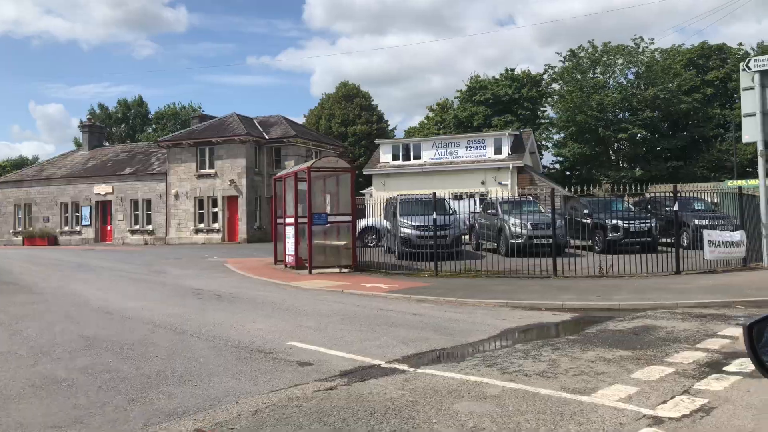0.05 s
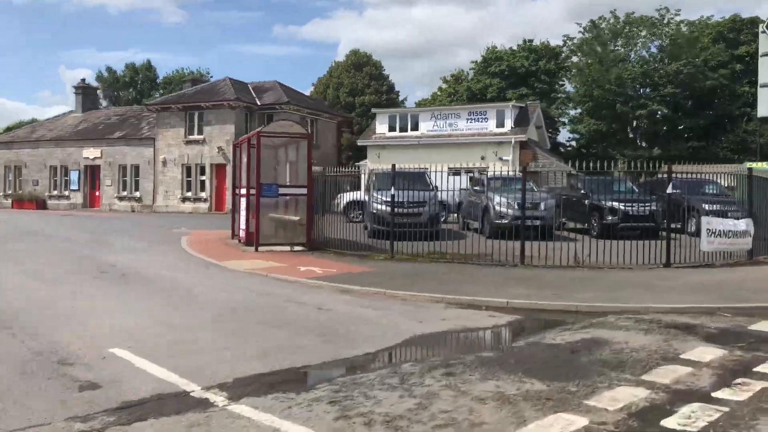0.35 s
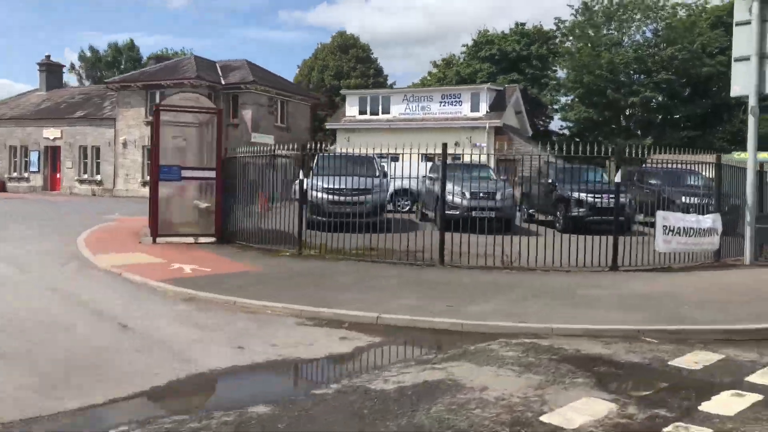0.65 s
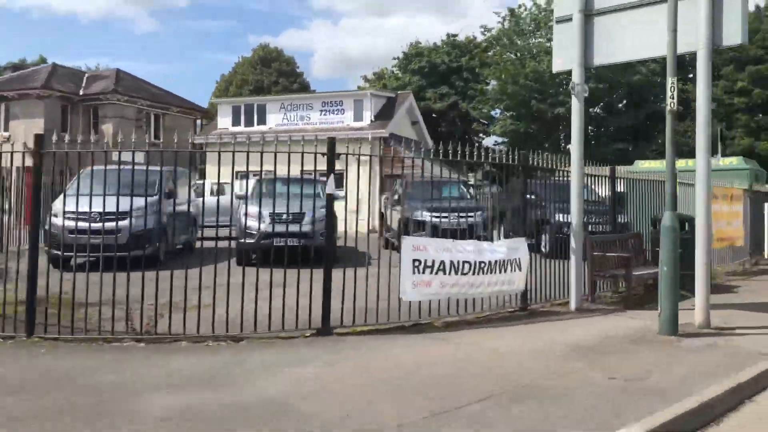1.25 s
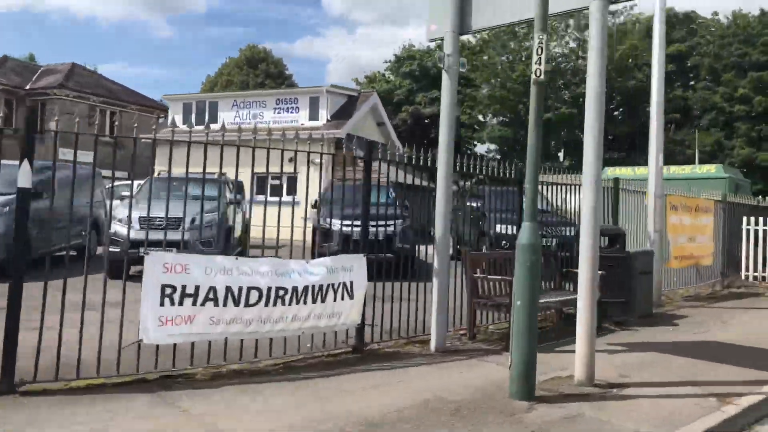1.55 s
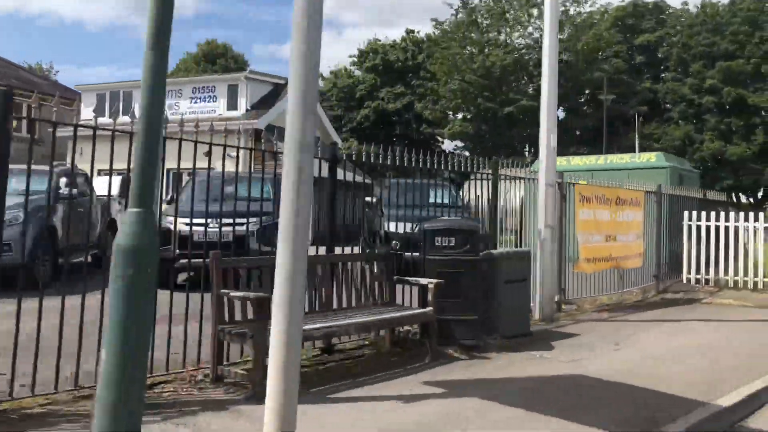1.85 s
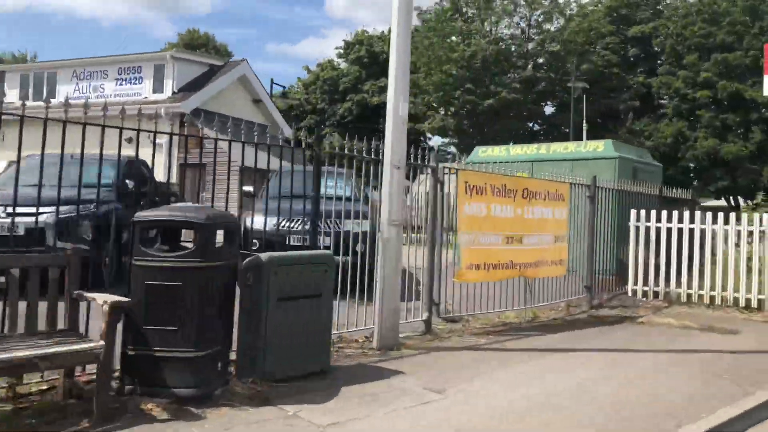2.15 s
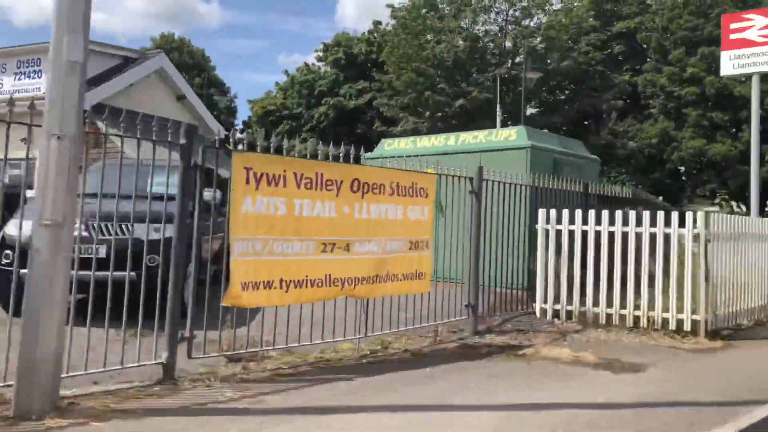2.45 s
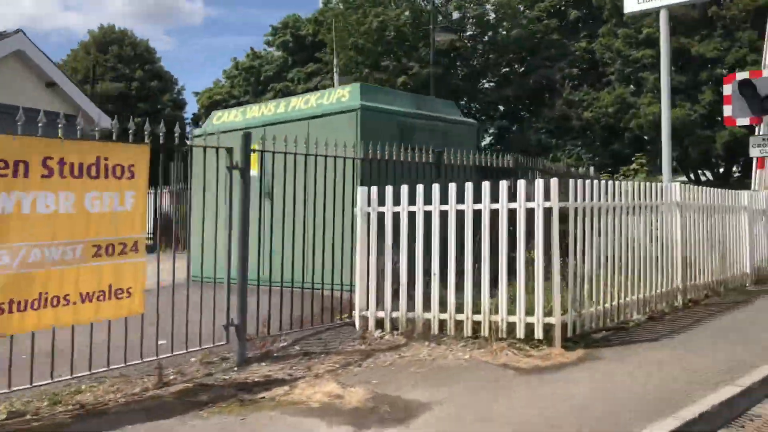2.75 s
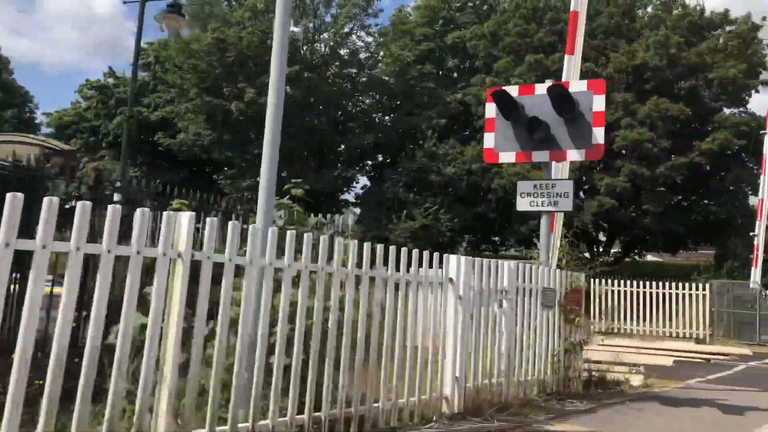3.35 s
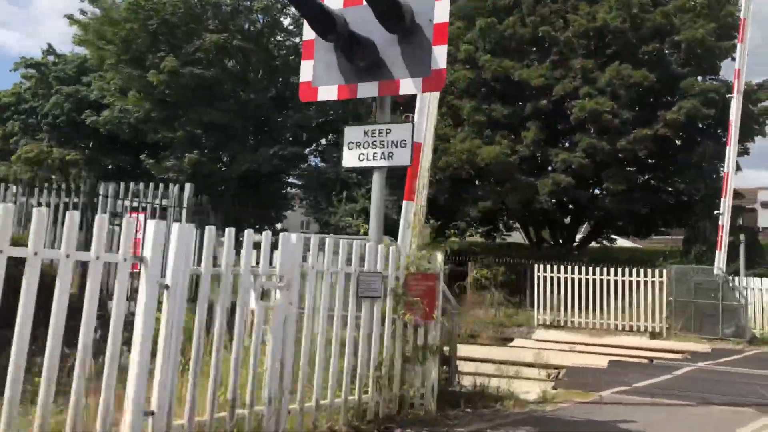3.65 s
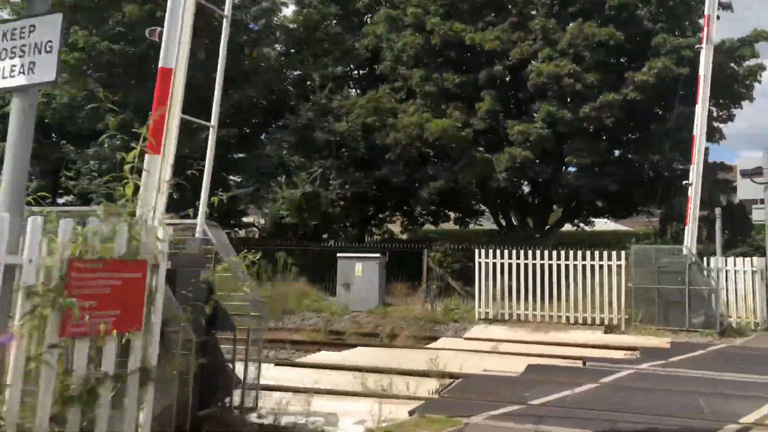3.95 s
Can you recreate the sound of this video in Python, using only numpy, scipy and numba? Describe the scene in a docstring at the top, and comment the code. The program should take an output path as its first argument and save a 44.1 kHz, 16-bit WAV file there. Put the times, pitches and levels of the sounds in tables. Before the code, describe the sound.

Gusts of wind rumble, pop and crack on the microphone at a moving car's open window. Softer tyre hiss from the street fades as the car slows, with faint ticks and distant chirps near the end.

```python
"""Wind buffets a microphone at the open window of a car rolling through a town.
From the start the airflow rumbles, with tyre hiss behind it. Gusts shed smaller eddies, so the
rumble flares into short rasps and pops; some gusts crack. After 2.5 s the hiss fades as the
car slows. Near 2.9 s come the first of four faint knocks and a high squeak, near 3.8 s three far
chirps. A limiter holds the peaks throughout."""
import sys
import numpy as np
from scipy import signal
from scipy.fft import rfft, irfft
from scipy.io import wavfile
from scipy.ndimage import uniform_filter1d, minimum_filter1d
from numba import njit

SR = 44100
rng = np.random.default_rng(int(sys.argv[2]) if len(sys.argv) > 2 else 0)


def materialize(psi):
    """Save the field psi as 16-bit PCM at rate SR to the path in sys.argv[1].

    A 1-D psi becomes a single channel; in a 2-D psi each row is a channel.
    """
    bounded = np.clip(np.atleast_2d(psi).T, -1, 1)
    quanta = np.round(bounded * 32767).astype(np.int16)
    wavfile.write(sys.argv[1], SR, quanta)


N = 176400


def undb(db):
    """Decibels to gain."""
    return 10 ** (np.asarray(db) / 20)


def curve(table):
    """Straight lines through (t/s, value) rows."""
    return np.interp(np.arange(N) / SR, *np.array(table).T)


def bell(t, at_s, length_s):
    """Flat-topped hump of height 1, centred on at_s."""
    hump = np.zeros(N)
    near = slice(*np.searchsorted(t, [at_s - 2 * length_s, at_s + 2 * length_s]))
    hump[near] = np.exp(-.5 * abs((t[near] - at_s) / (length_s / 2)) ** 2.94)
    return hump


def colour(x, spectrum):
    """Filter by (f/Hz, level/dB) rows, keeping the power of white noise."""
    hz, db = np.array(spectrum).T
    bin_hz = np.arange(N // 2 + 1) * SR / N
    gain = undb(np.interp(np.log(bin_hz + 1e-9), np.log(hz), db))
    return irfft(rfft(x) * gain / np.sqrt(np.mean(gain ** 2)), N)


def noise(spectrum):
    """Coloured noise, rms 1."""
    return colour(rng.standard_normal(N), spectrum)


def waver(per_s):
    """Smooth random signal, spread 1, about per_s new values a second."""
    hz = np.arange(N // 2 + 1) * SR / N
    x = irfft(rfft(rng.standard_normal(N)) * np.exp(-(2 * hz / per_s) ** 2), N)
    return x / x.std()


@njit
def lowpass(x, cutoff_hz, damping):
    """Two-pole low-pass, cut-off set per sample."""
    y, band_state, low_state = np.empty(len(x)), 0., 0.
    for i in range(len(x)):
        g = np.tan(np.pi * cutoff_hz[i] / SR)
        band = (band_state + g * (x[i] - low_state)) / (1 + g * (g + damping))
        y[i] = low_state + g * band
        band_state, low_state = 2 * band - band_state, 2 * y[i] - low_state
    return y


# wind between gusts: t/s, strength/dB
BASE_WIND = [(.04, -39.5), (.22, -29.5), (.37, -37.5), (.47, -24), (.62, -26.5), (.8, -29.5), (1.08, -26),
             (1.24, -31.5), (1.6, -32.5), (1.98, -42), (2.25, -31), (2.64, -31.5), (2.86, -39),
             (3.04, -25.5), (3.18, -35.5), (4.0, -37.5)]
# gusts: t/s, length/s, strength/dB
GUSTS = [(.056, 0.0088, -23.5), (0.091, 0.011, -19), (0.145, 0.0072, -16.5), (0.182, 0.0042, -19),
         (0.245, 0.0057, -20), (0.27, 0.0034, -14), (0.409, 0.0038, -21), (.441, 0.0076, -13),
         (0.461, 0.019, -14), (0.479, .006, -9), (0.505, .008, -14), (0.513, 0.0087, -7),
         (0.538, 0.0083, -7), (0.571, 0.0084, -10), (0.588, 0.0089, -13), (0.606, 0.0036, -8),
         (0.615, 0.0064, -20), (0.654, 0.0044, -11), (0.684, 0.021, -21.5), (0.716, 0.012, -14),
         (0.732, 0.0087, -17), (.754, 0.0038, -13.5), (.777, 0.0038, -13), (0.875, 0.012, -21.5),
         (0.934, 0.0046, -3), (0.981, 0.016, -16), (1.023, 0.012, -10.5), (1.045, 0.015, -22),
         (1.074, 0.02, -18.5), (1.129, 0.011, -13), (1.151, 0.0071, -7), (1.208, 0.015, -21),
         (1.279, 0.0093, -22), (1.39, 0.0096, -22), (1.406, .012, -10), (1.504, .005, -18),
         (1.592, 0.0065, -2), (1.676, 0.0055, -17), (1.726, .013, -24.5), (1.975, 0.011, -20.5),
         (2.055, 0.0075, -24), (2.118, 0.013, -13), (2.166, 0.01, -19), (2.218, 0.0023, -23),
         (2.262, 0.011, -12), (2.319, 0.0065, -16), (2.393, 0.0057, -17), (2.442, 0.0055, -13),
         (2.513, 0.021, -18.5), (2.554, 0.011, -14), (2.593, 0.0029, -18), (2.61, 0.011, -23),
         (2.717, 0.0091, -14.5), (2.736, 0.03, -25.5), (2.821, 0.0046, -16), (2.948, 0.0096, -18),
         (3.01, 0.011, -12.5), (3.093, 0.0076, -8), (3.200, .005, -19), (3.267, 0.0094, -17),
         (3.273, 0.0037, 0), (3.306, 0.0048, -12), (3.343, 0.011, -9), (3.403, 0.018, -20),
         (3.428, 0.0037, -18.5), (3.563, 0.0064, -13), (3.59, 0.016, -13), (3.603, 0.0081, -20),
         (3.639, 0.014, -23), (3.703, 0.018, -12), (3.820, 0.019, -22.5), (3.925, 0.027, -23.5),
         (3.947, 0.0062, -19)]
MEAN_WIND_DB = -30.5


def wind_strength(t):
    """Wind flutters, crackles and slackens just before each gust takes over; dB re mean wind."""
    crackle_db = 6 * waver(per_s=480)
    flutter_db = 5.5 * waver(per_s=120)
    db = curve(BASE_WIND) + np.minimum(flutter_db + crackle_db, 9)
    for at_s, length_s, _ in GUSTS:
        db -= 1.5 * bell(t, at_s - length_s / 2 - .0058, length_s=.0097)
    for at_s, length_s, gust_db in GUSTS:
        crest_db = gust_db + .41 * crackle_db
        db += (crest_db - db) * bell(t, at_s, length_s)
    return db - MEAN_WIND_DB


# lulls in the wind: t/s, length/s, depth/dB
LULLS = [(0.074, .012, 5.5), (0.311, 0.033, 9), (0.386, 0.022, 6), (0.848, 0.028, 7), (1.116, 0.035, 5),
         (1.346, 0.047, 9), (1.472, 0.039, 12.5), (1.869, 0.0087, 12), (2.036, 0.013, 19), (2.84, 0.042, 3),
         (3.19, 0.013, 17.5), (3.298, 0.012, 10), (3.37, 0.039, 12), (3.483, 0.033, 11), (3.615, 0.01, 17),
         (3.696, 0.048, 8.5)]


def lulls(t):
    """Brief drops of the wind and its rumble; depth in dB."""
    return sum(depth_db * bell(t, at_s, length_s) for at_s, length_s, depth_db in LULLS)


# eddy spectrum before the low-pass: f/Hz, relative level/dB
EDDY_SPECTRUM = [(20, -46), (60, -12.5), (130, -11.5), (220, 3), (350, 2.5), (550, -0.5), (900, -2),
                 (1500, -7.5), (3000, -12.5), (8000, -16.5)]


def buffeting(strength_db):
    """Eddies hit the microphone: stronger wind is louder and reaches higher."""
    cutoff_at_mean_hz, db_per_octave = 842, 22.5
    cutoff_hz = np.clip(cutoff_at_mean_hz * 2 ** (strength_db / db_per_octave), 20, SR / 4)
    eddies = lowpass(noise(EDDY_SPECTRUM), cutoff_hz, damping=1.577)
    eddies = lowpass(eddies, cutoff_hz, damping=1.52)
    return eddies * undb(-10.5 + .38 * strength_db)


# pop of one eddy: f/Hz, relative level/dB
POP_SPECTRUM = [(100, -15), (500, 7.5), (1000, 8), (1500, 4.5), (2200, -8), (3200, -16.5), (4500, -28),
                (6500, -38), (12000, -66)]


def eddy_pops(strength_db):
    """Single eddies snap across the microphone port, at random and at each gust's crest."""
    pops_per_s, db_per_db = 200, .83
    hits = rng.random(N) < pops_per_s / SR
    kicks = hits * rng.uniform(-2.14, 3.37, N) * undb(db_per_db * strength_db)
    for (at_s, _, gust_db), sign in zip(GUSTS, rng.choice([-1, 1], len(GUSTS))):
        kicks[int(at_s * SR)] += sign * undb(1 + db_per_db * (gust_db - MEAN_WIND_DB))
    return colour(kicks, POP_SPECTRUM) * undb(-14.5)


# air rumble: f/Hz, relative level/dB
RUMBLE_SPECTRUM = [(22, -51), (30, -45), (40, -12), (52, -5), (70, 0.5), (100, -1.5), (150, -4),
                   (250, -10.5), (500, -34.5), (1500, -104)]
# base course of the rumble: t/s, level/dB
RUMBLE_LEVEL = [(.04, -15), (.3, -11), (1.0, -12.5), (2.0, -10), (3.0, -11.5), (4.0, -12)]
# thumps of large eddies: t/s, length/s, boost/dB
THUMPS = [(0.04, 0.054, 9.5), (0.163, .026, 7.5), (1.528, 0.041, 5.5), (3.034, 0.018, 6), (3.233, .05, 2),
          (3.75, 0.016, 7.5)]


def window_rumble(t, strength_db, lull_db):
    """Large, slow eddies at the window swell into thumps and sink in the lulls."""
    thump_db = sum(boost_db * bell(t, at_s, length_s) for at_s, length_s, boost_db in THUMPS)
    level_db = curve(RUMBLE_LEVEL) + thump_db + .23 * strength_db - lull_db
    return noise(RUMBLE_SPECTRUM) * undb(level_db)


# tyre hiss, its narrow rush and its airy top: f/Hz, relative level/dB
HISS_SPECTRUM = [(20, -9), (200, 14.5), (800, 18), (1300, 13), (2000, 2.5), (2600, -3.5), (3500, -7),
                 (4500, -6), (6300, -11.5), (8200, -14.5), (11500, -20), (15500, -27)]
RUSH_SPECTRUM = [(2200, -15), (3100, 0), (3500, 1.5), (4000, -4.5), (4800, -27)]
AIRY_SPECTRUM = [(4500, -10), (6100, 1.5), (7500, -4.5), (11000, -8), (15000, -10)]
# course of the same three bands: t/s, level/dB
HISS_LEVEL = [(.04, -35.5), (.35, -34), (1.2, -36.5), (1.8, -32.5), (2.5, -32), (3.2, -36), (4.0, -39)]
RUSH_LEVEL = [(.04, -57), (.6, -51), (1.1, -51), (2.2, -48.5), (2.7, -60), (3.1, -66), (4.0, -61)]
AIRY_LEVEL = [(.04, -56), (.35, -51.5), (.65, -51), (.85, -53.5), (2.2, -52.5), (2.45, -51.5), (3.02, -63),
              (3.075, -50.5), (3.17, -76), (3.63, -77), (3.68, -56), (3.74, -79), (4.0, -82)]


def tyre_hiss():
    """Tyres hiss on the road, waver slightly and fade as the car slows."""
    hiss = noise(HISS_SPECTRUM) * undb(curve(HISS_LEVEL))
    rush = noise(RUSH_SPECTRUM) * undb(curve(RUSH_LEVEL))
    airy_top = noise(AIRY_SPECTRUM) * undb(curve(AIRY_LEVEL))
    return (hiss + rush + airy_top) * undb(.4 * waver(per_s=28))


# cracks on some gusts: t/s, level/dB
CRACKS = [(0.087, -29), (0.269, -22.5), (0.567, -14), (0.736, -17), (1.021, -6.5), (1.1485, -9.5),
          (1.406, -17), (2.12, -20.5), (2.554, -12), (3.271, -7.5), (3.341, -16), (3.5649, -17)]
# one crack: f/Hz, relative level/dB
CRACK_SPECTRUM = [(600, 11), (1500, 8), (2500, 0), (4000, -11), (6000, -21.5), (12000, -35.5)]


def gust_cracks(t):
    """Some gusts break on the microphone with a bright crack."""
    envelope = sum(undb(db) * bell(t, at_s, length_s=.0027) for at_s, db in CRACKS)
    return noise(CRACK_SPECTRUM) * envelope


# knocks in the car: t/s, level/dB
KNOCKS = [(2.854, -33), (3.135, -29.5), (3.44, -31), (3.505, -34)]
# one knock: f/Hz, relative level/dB
KNOCK_SPECTRUM = [(800, -25), (2200, 11), (3800, 4), (5600, 2), (7500, -17), (12000, -37), (16000, -36)]


def knocks(t, decay_s=.0023):
    """Short dry ticks as the car jolts."""
    envelope = sum(undb(db) * (t >= at_s) * np.exp(-abs(t - at_s) / decay_s) for at_s, db in KNOCKS)
    return colour(rng.standard_normal(N) * envelope, KNOCK_SPECTRUM)


def squeak(t, at_s=2.86, length_s=.24, start_hz=12850, fall_hz_per_s=6500):
    """A faint, very high, breathy squeak sinks in pitch."""
    age_s = np.clip(t - at_s, 0, length_s)
    phase = 2 * np.pi * np.cumsum(start_hz - fall_hz_per_s * age_s) / SR
    envelope = undb(-61) * np.sin(np.pi * age_s / length_s)
    return envelope * waver(per_s=1000) * np.sin(phase)


# bird-like chirps: t/s, length/s, start f/Hz, end f/Hz, level/dB
CHIRPS = [(3.783, 0.11, 2540, 2420, -49.5), (3.854, 0.058, 3100, 2440, -49), (3.895, 0.07, 2990, 2810, -51)]


def chirps(t):
    """Thin falling whistles far off."""
    whistles = np.zeros(N)
    for at_s, length_s, start_hz, end_hz, db in CHIRPS:
        progress = np.clip((t - at_s) / length_s, 0, 1)
        phase = 2 * np.pi * np.cumsum(start_hz + (end_hz - start_hz) * progress) / SR
        whistles += undb(db) * np.sin(np.pi * progress) * np.sin(phase)
    return whistles


def scene():
    """Wind in front, road behind; mono, with a fast fade at each end."""
    t = np.arange(N) / SR
    strength_db, lull_db = wind_strength(t), lulls(t)
    mix = buffeting(strength_db - lull_db) + eddy_pops(strength_db - lull_db)
    mix += window_rumble(t, strength_db, lull_db) + tyre_hiss()
    mix += gust_cracks(t) + knocks(t) + squeak(t) + chirps(t)
    start_s, fade_s = .034, .0011
    ramp = np.clip(np.minimum(t - start_s, t[-1] - t) / fade_s, 0, 1)
    return (mix * np.sin(np.pi / 2 * ramp) ** 2)[None]


def record(dry):
    """A fast look-ahead limiter holds the peaks; a steep low-pass cuts the top."""
    ceiling, lookahead_s, top_hz = .93, .0025, 15900
    window = int(lookahead_s * SR)
    gain = minimum_filter1d(ceiling / np.maximum(abs(dry), ceiling), 2 * window)
    gain = uniform_filter1d(uniform_filter1d(gain, window), window)
    top_cut = signal.ellip(10, .1, 90, top_hz, fs=SR, output="sos")
    return signal.sosfilt(top_cut, dry * gain)


dry = scene()
out = record(dry)
materialize(out)
```